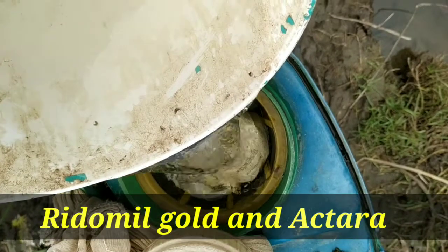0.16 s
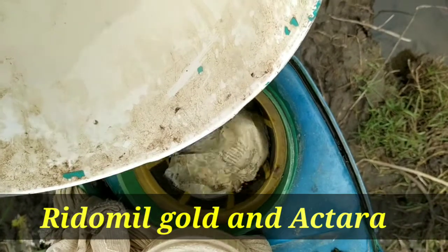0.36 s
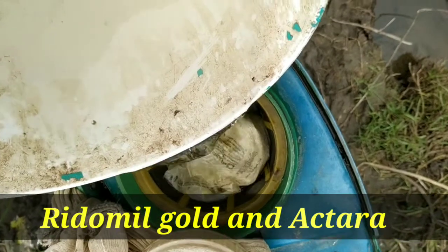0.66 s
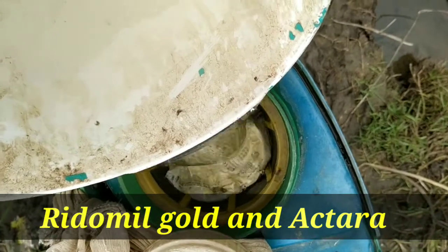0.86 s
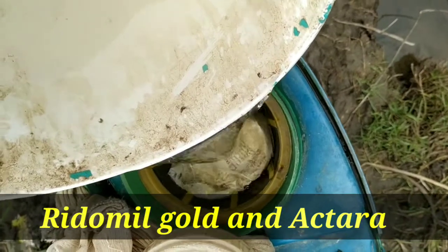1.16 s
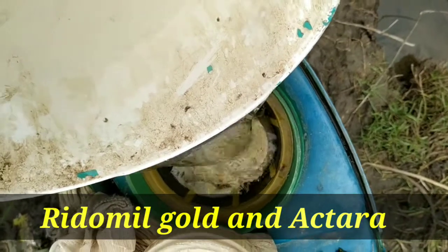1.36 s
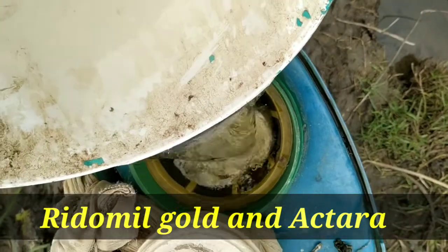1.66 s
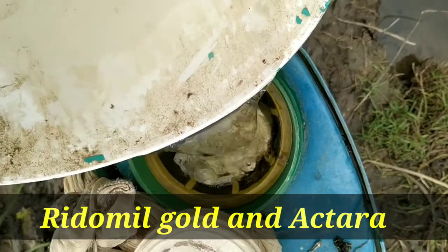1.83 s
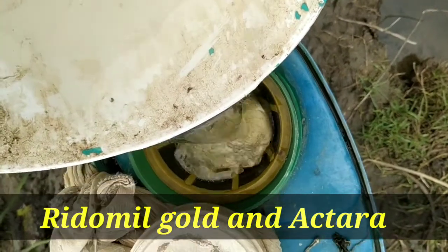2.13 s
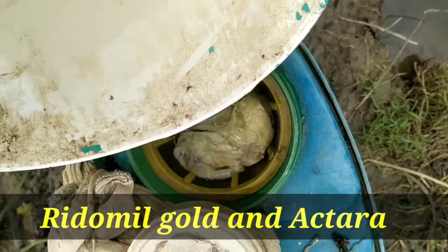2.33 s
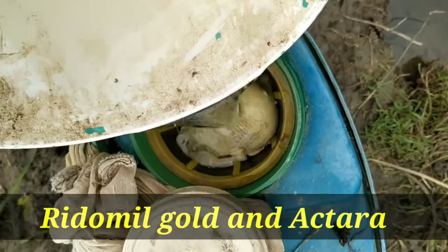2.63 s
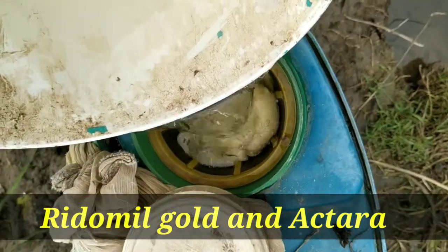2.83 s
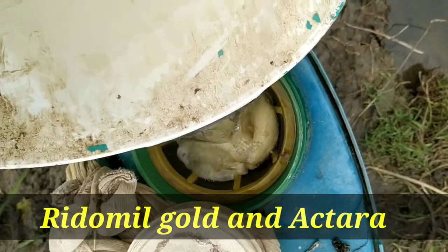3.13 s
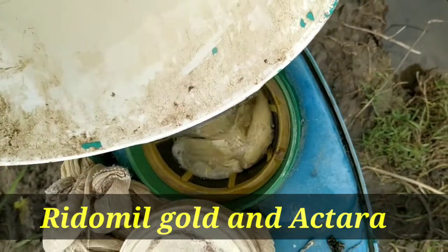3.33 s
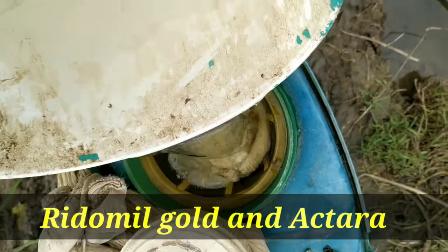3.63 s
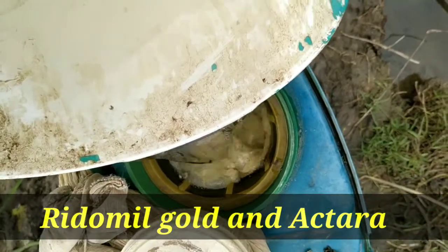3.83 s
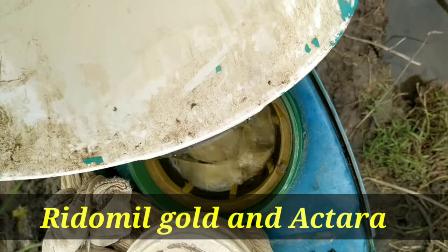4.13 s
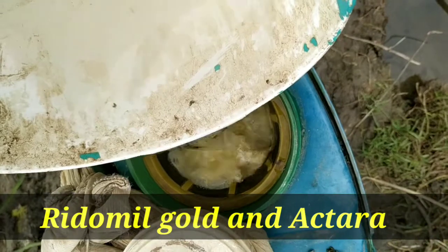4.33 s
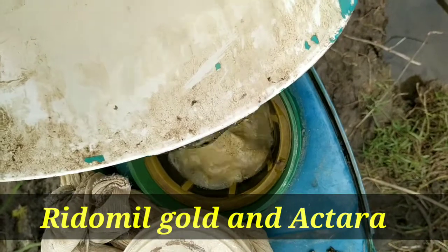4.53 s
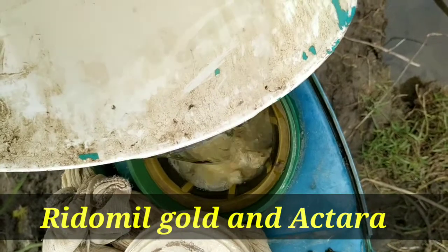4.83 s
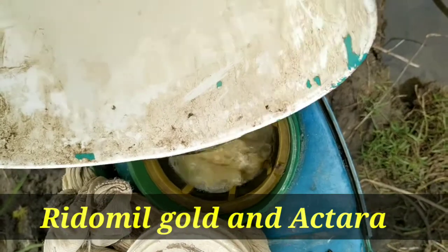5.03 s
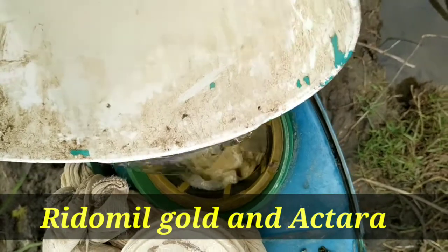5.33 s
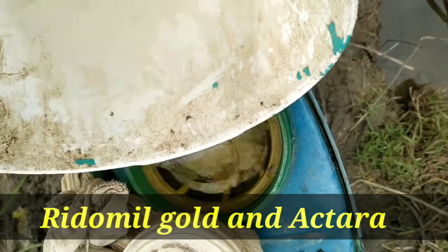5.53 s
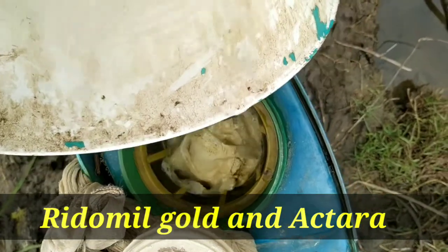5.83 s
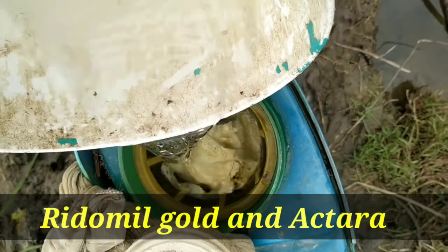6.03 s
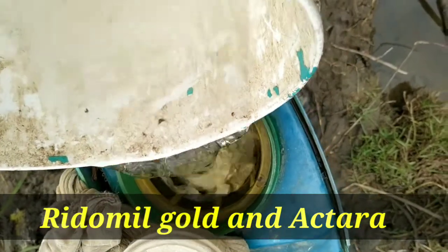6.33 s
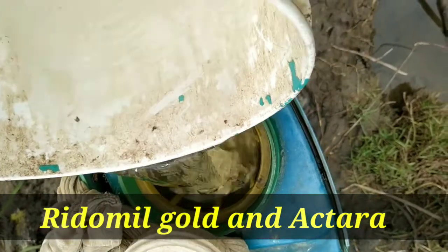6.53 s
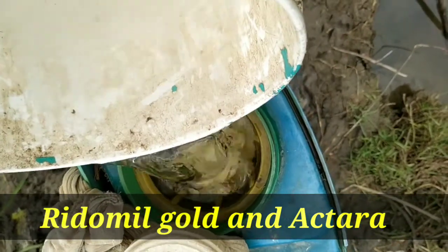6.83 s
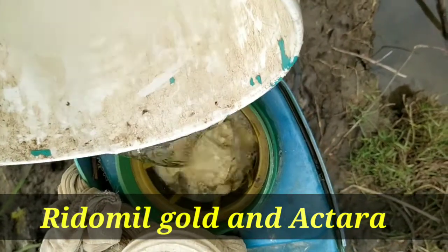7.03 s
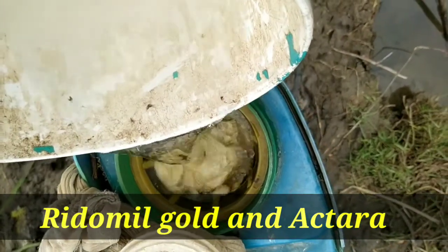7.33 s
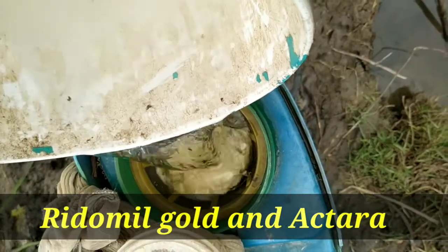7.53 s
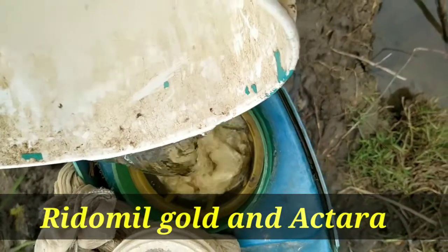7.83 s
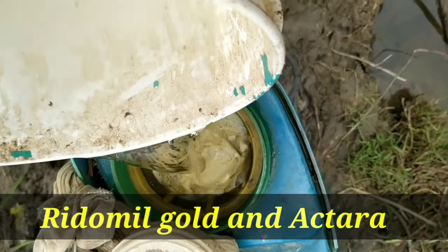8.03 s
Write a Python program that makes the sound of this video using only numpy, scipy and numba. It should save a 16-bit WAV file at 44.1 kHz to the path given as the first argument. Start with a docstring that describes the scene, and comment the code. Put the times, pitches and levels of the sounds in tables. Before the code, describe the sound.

Water pours in uneven spurts from a basin through a cloth-lined strainer into a hollow plastic tank, gurgling and crackling while wind buffets the microphone.

```python
"""Outdoors, water runs from a tilted basin through a cloth-lined strainer into a plastic sprayer tank.
Bubbles gurgle and droplets crackle in uneven spurts, built from many short, dying sine tones.
Filters make the tank ring, more strongly when its neck is open; delayed copies echo in the strainer.
Filtered noise makes the wind rumble and buffet on the microphone, with low thumps from hard eddies.
Fading tones make two knocks on the plastic: a loud dull one, then a faint brighter one."""
import sys
import numpy as np
from scipy import signal
from scipy.fft import rfft, irfft, next_fast_len
from scipy.io import wavfile
from scipy.ndimage import uniform_filter1d, map_coordinates
from numba import njit

SR = 44100
rng = np.random.default_rng(int(sys.argv[2]) if len(sys.argv) > 2 else 0)


def log_audio(samples):
    """Write samples as a 16-bit WAV file to the path given in sys.argv[1]."""
    # one column per channel
    frames = np.atleast_2d(samples).T
    # limit to full scale, then quantise
    limited = np.clip(frames, -1, 1)
    pcm = np.round(limited * 32767).astype(np.int16)
    wavfile.write(sys.argv[1], SR, pcm)


N = 360738
TIME = np.arange(N) / SR  # seconds

# colour of the faint open air: (frequency [Hz], relative level [dB])
AIR_COLOUR = [(100, -1.5), (400, -18.5), (1000, -10.5), (3000, -22.5), (15000, -26)]

# changing strength of the breeze: (time [s], level [dB])
BREEZE = [(0, -45.5), (.9, -49.5), (1.3, -48.5), (2.4, -39), (4.4, -45.5), (5.3, -43), (5.7, -49),
          (6.2, -56.5), (6.55, -44.5), (7.0, -52.5), (8.18, -46)]
# gusts that swell and ebb on top of it: (time of crest [s], width [s], level [dB])
GUSTS = [(1.33, 0.14, -32), (1.89, 0.039, -33.5), (2.52, 0.055, -33.5), (2.8, 0.037, -27.5),
         (3.072, 0.026, -26.5), (3.29, 0.034, -36), (3.49, 0.018, -23.5), (3.83, 0.33, -33),
         (4.193, 0.026, -21), (4.47, 0.12, -30.5), (7.69, 0.032, -38.5), (8.12, 0.041, -35.5)]
# colour of the wind's rumble: (frequency [Hz], relative level [dB])
RUMBLE_COLOUR = [(12, -2.5), (25, -2), (50, -2.5), (90, -6.5), (140, -15), (220, -24.5), (320, -36),
                 (800, -82.5)]
# sharp buffets: (start [s], length [s], strength added to the wind pressure [dB])
BUFFETS = [(1.008, 0.052, -40.5), (1.832, 0.13, -40.5), (2.152, 0.093, -42), (2.346, 0.025, -32.5),
           (2.447, 0.051, -27.5), (2.501, 0.08, -27.5), (2.572, 0.033, -29.5), (2.829, 0.018, -31),
           (3.052, 0.022, -29), (3.099, 0.054, -35.5), (3.461, 0.037, -28), (3.605, 0.054, -32.5),
           (3.726, 0.055, -26), (3.765, 0.063, -24), (3.859, 0.017, -26.5), (3.908, 0.029, -24),
           (4.01, 0.036, -26), (4.161, 0.043, -21.5), (4.313, 0.051, -32), (8.084, 0.045, -40)]
# colour of the buffets: (frequency [Hz], relative level [dB])
BUFFET_COLOUR = [(30, 0.5), (60, 8), (130, 2), (260, -5), (420, -18), (600, -54), (900, -37), (1600, -55)]
# round, low thumps from the hardest eddies: (time of crest [s], top of the swell [dB], pitch [Hz])
THUMPS = [(1.037, -36.5, 167), (1.398, -30, 140), (2.36, -30.5, 302), (2.479, -27.5, 169),
          (2.536, -24, 287), (3.061, -22, 195), (3.787, -21, 130), (3.808, -21.5, 200), (3.861, -21.5, 266),
          (3.927, -23, 265), (4.02, -24.5, 280), (4.17, -23, 490), (4.186, -24, 109)]
THUMP_CYCLES = 0.77  # half-width of the swell [cycles]

# knocks on the plastic: (start [s], level on top of the mode levels [dB], brightness [Hz])
KNOCKS = [(4.9396, -25, 470), (5.754, -41.5, 1400)]
# ringing modes of the plastic: (pitch [Hz], relative level [dB], time to fall 60 dB [s])
PLASTIC_MODES = [(202, -11.5, 0.24), (295, -0.5, 0.081), (376, 7, 0.051), (423, -7, 0.15),
                 (552, 1.5, 0.039), (777, 0, 0.054), (993, 3.5, 0.061), (1250, 3, 0.031)]

# spatters of tiny drops: (start [s], length [s], level [dB])
SPATTERS = [(0.145, 0.02, -49), (0.9, 0.017, -50), (1.115, 0.0096, -43), (1.364, 0.016, -48),
            (1.5, .022, -48), (1.786, 0.019, -52), (2.752, 0.022, -53), (3.52, 0.02, -48),
            (4.144, 0.017, -50), (5.668, 0.021, -50), (5.85, 0.02, -49.5), (6.336, 0.0044, -60),
            (7.428, 0.04, -54), (8.071, 0.12, -52.5)]
# colour of the spatters: (frequency [Hz], relative level [dB])
SPATTER_COLOUR = [(4000, -8), (6000, -4), (15500, 2)]
# drops that smack on the strainer: (start [s], peak level [dB], brightest pitch [Hz])
DROPS = [(0.238, -31.5, 5800), (0.607, -38, 5330), (0.763, -37, 4530), (0.948, -39.5, 1290),
         (1.485, -36, 14000), (1.764, -26, 4960), (2.093, -32.5, 6530), (2.143, -26, 3800),
         (2.162, -34, 4500), (3.175, -33, 12000), (3.803, -38, 1190), (4.864, -37.5, 2500),
         (4.975, -48, 2880), (5.47, -35.5, 3940), (5.507, -33, 5270), (5.575, -33, 5100),
         (5.716, -38, 5800), (6.094, -42, 1920), (6.118, -28, 8500), (6.2054, -35, 6000),
         (6.336, -36, 5370), (6.457, -29.5, 6440), (6.828, -31, 5940), (6.8843, -32, 5890)]
SMACK_WIDTH = .35  # bandwidth of a smack, as a share of its brightest pitch
# single large bubbles, level before flutter and echo:
# (start [s], level [dB], starting pitch [Hz], time to fall 60 dB [s], pitch rise [share])
PLINKS = [(0.763, -38, 1730, 0.084, 0.055), (1.124, -36.5, 772, 0.045, 0.22),
          (1.7907, -43, 1870, 0.067, .04), (1.809, -31.5, 2230, 0.047, 0.061),
          (1.8911, -34, 1850, 0.019, 0.51), (2.034, -31.5, 2300, 0.024, 0.083),
          (2.3, -40.5, 990, 0.031, 0.083), (2.578, -33, 1500, 0.029, 0.046),
          (2.852, -39, 2340, 0.043, 0.24), (3.203, -40, 984, 0.033, .1), (3.561, -34.5, 2020, 0.015, .1),
          (3.74, -25, 5500, 0.01, .03), (4.149, -32, 5470, 0.019, 0.027), (4.411, -38, 975, 0.028, .08),
          (5.8019, -40, 1070, 0.024, 0.22), (6.456, -33, 5290, 0.019, .03), (6.498, -29, 4130, 0.019, .03),
          (6.569, -42, 1253, 0.14, 3.8), (7.2513, -45, 2115, 0.1, 0.14), (7.558, -33.5, 1436, 0.027, 0.31)]
CUP_T60_S, CUP_DB = 0.035, -9.5  # strainer echo: time to fall 60 dB [s], level before that fall [dB]

# strength of the pour as the basin tips and eases: (time [s], spray level before surges and lulls [dB])
FLOW = [(0, -54), (0.22, -53), (0.7, -59), (1.5, -54), (2.08, -56.5), (2.45, -53.5), (2.6, -61),
        (2.85, -54), (3.35, -60.5), (3.85, -54), (4.45, -56), (4.68, -59), (5.0, -57.5), (5.12, -59),
        (5.4, -61), (5.58, -51), (5.7, -49.5), (5.78, -58), (6.02, -59), (6.2, -56.5), (6.85, -54),
        (7.6, -53), (8.18, -55.5)]
# lulls, when the stream thins: (time of middle [s], width [s], depth [dB])
LULLS = [(0.85, 0.01, -13), (2.405, 0.0055, -11), (5.265, 0.045, -0.5), (5.9, 0.012, -13),
         (6.01, 0.021, -46), (7.151, 0.02, -11), (7.38, 0.05, -8)]
# slops, when a lump of water falls at once: (start [s], length [s], gurgle [dB], spray [dB])
SLOPS = [(0.152, 0.11, -49, -57), (0.322, 0.028, -43.5, -53), (0.402, 0.024, -40.5, -47.5),
         (0.496, 0.04, -44.5, -69), (0.621, 0.015, -46, -41), (0.789, 0.075, -49.5, -52.5),
         (0.946, 0.023, -45, -60), (1.005, 0.031, -51.5, -63), (1.913, 0.1, -46.5, -52),
         (2.151, 0.1, -50, -64.5), (3.185, 0.052, -67, -49.5), (4.856, 0.012, -63, -42.5),
         (4.921, 0.038, -48, -43.5), (5.441, 0.044, -52, -49), (3.986, 0.08, -55, -57),
         (6.055, 0.0087, -39.5, -49), (6.456, 0.14, -59.5, -49), (6.821, 0.099, -61, -48),
         (7.237, 0.047, -54.5, -48), (7.53, 0.051, -53, -48)]
# how much of the hollow tank is heard: (time [s], level beside the gurgle [dB])
NECK = [(0, 2.5), (1.25, -1.5), (1.65, 8), (2.1, 4.5), (2.5, -4.5), (4.1, -1), (4.7, -7.5), (8.18, -3)]
# air resonances of the tank: (pitch [Hz], width [Hz], relative level [dB])
TANK_RESONANCES = [(810, 89, -2.5), (1001, 50, 7), (2097, 420, 13)]
# centre of the tank's moving resonance, mostly climbing as it fills: (time [s], pitch [Hz])
FILL_PITCH = [(0, 1777), (1.5, 1845), (2.3, 1870), (4.4, 1853), (5.6, 2030)]
FILL_WIDTH_HZ, FILL_DB = 39, 0.5  # its width, and its level beside the other resonances
# colour of the gurgling bubbles: (frequency [Hz], relative level [dB])
GURGLE_COLOUR = [(180, -2.5), (380, 5.5), (480, -6.5), (600, 5), (1100, 1), (1500, -3.5), (2050, -6.5),
                 (2600, -13.5), (3400, -48), (5000, -31)]
# colour of the spray: (frequency [Hz], relative level [dB])
SPRAY_COLOUR = [(1500, -13), (2500, -3.5), (3400, -7), (4150, -4.5), (4400, -6.5), (5400, 0), (6500, -4),
                (8500, -7), (12000, -7.5), (15500, -5.5)]
GURGLE_DB, GURGLE_FOLLOW = -57.5, 0.33  # level at average flow, without tank; dB gained per dB of flow
SURGE_DB, SURGE_PER_S = 2.85, 14  # random surges: spread [dB], new values per second
FULL_SPRAY_DB, SOFT_SPRAY_HZ = -56, 8060  # below this level, spray loses its top above this pitch

TOP_HZ = 15800  # highest pitch the recorder keeps


def undb(db):
    """Turn decibels into a gain."""
    return 10 ** (np.asarray(db) / 20)


def curve(rows):
    """Join (time, value) rows by straight lines."""
    return np.interp(TIME, *np.transpose(rows))


def unit(x):
    """Scale a sound to an average (rms) level of 1."""
    return x / np.sqrt(np.mean(x ** 2) + 1e-18)


def even(x, span_s):
    """Hold the rms near 1 over stretches of span_s, leaving faster detail alone."""
    size = max(int(span_s * SR), 8)
    power = uniform_filter1d(uniform_filter1d(x ** 2, size), size)
    return x / np.sqrt(np.abs(power) + 1e-12)


def walk(rate):
    """Wander at random with a spread near 1, heading for a new value `rate` times a second."""
    points = rng.standard_normal(8192)
    # joining points by lines shrinks the spread; the last factor restores it
    return np.interp(TIME * rate, np.arange(len(points)), points) * np.sqrt(3 / 2)


def noise():
    """White noise: all pitches equally strong."""
    return rng.standard_normal(N)


def colour(x, points):
    """Filter through (frequency, level) points, with no sound ahead of its cause."""
    hz, db = np.transpose(points)
    size = next_fast_len(N + 8192, True)
    freqs = np.arange(size // 2 + 1) * SR / size + 1
    gain = undb(np.interp(np.log(freqs), np.log(hz), db))
    # folding the cepstrum forward gives the minimum-phase filter
    cepstrum = irfft(np.log(gain), size)
    cepstrum[1:size // 2] *= 2
    cepstrum[size // 2 + 1:] = 0
    return irfft(rfft(x, size) * np.exp(rfft(cepstrum)), size)[:N]


def resonate(x, hz, width):
    """Favour pitches near hz, with gain 1 at the centre."""
    return signal.lfilter(*signal.iirpeak(hz, hz / width, fs=SR), x)


def glide(x, hz, width):
    """Resonance whose centre follows the curve hz."""
    turn = np.exp(2j * np.pi * np.cumsum(hz) / SR)
    pole = np.exp(-np.pi * width / SR)
    # shift the moving pitch down to zero, smooth there, then shift it back
    return np.real(turn * signal.lfilter([1 - pole], [1, -pole], x / turn))


def bell(middle, width):
    """Bell-shaped rise and fall around a moment."""
    return np.exp(-((TIME - middle) / width) ** 2 / 2)


def add(out, s, sound):
    """Mix a short sound in at time s."""
    start = max(int(s * SR), 0)
    out[start:start + len(sound)] += sound[:max(N - start, 0)]


def open_air():
    """Faint filtered noise stands for the open air."""
    return undb(-59.5) * unit(colour(noise(), AIR_COLOUR))


def air_speed():
    """Strength of the wind: bell-shaped gusts add their power to the breeze."""
    gusts = (undb(db) * bell(s, width) for s, width, db in GUSTS)
    return np.sqrt(undb(curve(BREEZE)) ** 2 + sum(gust ** 2 for gust in gusts))


def wind():
    """Eddies rumble on the microphone; stronger wind brings out more of the higher buffets and flaps."""
    breeze = air_speed()
    rumble = even(colour(noise(), RUMBLE_COLOUR), 0.086) * breeze * undb(3.64 * walk(22))
    pressure = 0.55 * breeze ** 1.34
    for s, length, db in BUFFETS:
        push = signal.windows.tukey(max(int(length * SR), 8), .6)
        add(pressure, s, undb(db) * push)
    buffets = pressure * even(colour(noise(), BUFFET_COLOUR), 0.039)
    flaps = unit(resonate(resonate(noise(), 455, 270), 455, 270))
    # squaring the pressure favours flaps in the hardest buffets
    return rumble + buffets + 1.01 * pressure ** 2 * flaps


def thumps():
    """An eddy pushes and pulls on the microphone for a cycle or two."""
    out = np.zeros(N)
    for s, db, hz in THUMPS:
        cycles = hz * (TIME[:4096] - TIME[2048])
        swell = np.exp(-(cycles / THUMP_CYCLES) ** 2)
        wave = np.sin(2 * np.pi * (cycles + rng.random()))
        add(out, s - TIME[2048], undb(db) * swell * wave)
    return out


def knocks():
    """The plastic rings briefly; each knock has its own brightness, above which the modes weaken."""
    out, t = np.zeros(N), TIME[:6000]
    push = np.minimum(t / 0.0025, 1)  # the blow builds up over a short contact
    for s, level_db, bright_hz in KNOCKS:
        modes = np.zeros(len(t))
        for hz, db, t60 in PLASTIC_MODES:
            tone = undb(db - 60 * t / t60) * np.sin(2 * np.pi * hz * t)
            modes += tone / (1 + (hz / bright_hz) ** 4)
        add(out, s, undb(level_db) * push * modes)
    return out


@njit
def ring(times, hz, t60, size, rise, onset):
    """Each bubble is a fading sine that swells over `onset` cycles and glides in pitch by `rise`."""
    out = np.zeros(N)
    for k in range(len(times)):
        start, length, phase = int(times[k] * SR), t60[k] * SR, 0.
        gain, fade = size[k], np.exp(-6.9 / length)
        for i in range(min(int(length), N - start)):
            phase += min(hz[k] * (1 + rise[k] * i / length) / SR, .45)
            out[start + i] += gain * min(phase / onset, 1.) * np.sin(2 * np.pi * phase)
            gain *= fade
    return out


def bubbles(flow, low_hz, high_hz, cycles, scatter_db, rise, count):
    """Drops land more often when the flow surges; each traps three bubbles of like size within milliseconds."""
    when, pitch, loud = np.repeat(rng.random((count, 3)), 3, axis=0).T
    delay, detune, life, lift, share = rng.random((len(when), 5)).T
    births = np.cumsum(flow)
    times = np.interp(when, births / births[-1], TIME) + .007 * delay ** 2
    hz = low_hz * (high_hz / low_hz) ** pitch * 2 ** (0.577 * (detune - .5))
    t60 = cycles * 2 ** (3 * life - 2) / hz
    # most drops are faint, a few loud; small bubbles are short, so they peak higher
    size = undb(-scatter_db * np.log(loud + 0.023)) * share * hz / low_hz
    return unit(ring(times, hz, t60, size, rise * (2 * lift - .3), 0.19))


def spatters():
    """A sheet of water tears into a shower of tiny drops: a sharp start, then ticks that die away."""
    gain, t = np.zeros(N), TIME[:8192]
    for s, length, db in SPATTERS:
        swell = np.minimum(t / 0.0016, 1) * np.exp(-(t / length) ** 2)
        add(gain, s, undb(db) * swell)
    ticks = bubbles(np.ones(N), 5500, 14400, cycles=13, scatter_db=11.5, rise=0, count=5000)
    return gain * even(colour(ticks, SPATTER_COLOUR), 0.011)


def drops():
    """A drop smacks with a short broad burst and a brief ring."""
    out, t = np.zeros(N), TIME[:2048]
    decay = np.exp(-t / .0016) + .16 * np.exp(-t / .008)
    for s, db, hz in DROPS:
        burst = rng.standard_normal(len(t)) * decay
        smack = resonate(burst, hz, SMACK_WIDTH * hz)
        add(out, s, undb(db) * smack / np.abs(smack).max())
    return out


def strainer_echo(x):
    """Each splash bounces around the strainer cup; the heaving water keeps changing the paths."""
    out = x
    for lag in np.geomspace(.001, .007, 6):  # average delays in seconds
        path = lag * (1 + .12 * walk(9))
        bounce = map_coordinates(x, [(TIME - path) * SR], order=3)
        out = out + undb(CUP_DB - 60 * lag / CUP_T60_S) * bounce
    return out


def plinks():
    """Single large bubbles stand out, gliding up as they surface; churning water makes them flutter."""
    s, db, hz, t60, rise = np.array(PLINKS, float).T.copy()
    flutter = undb(3 * walk(700))
    return strainer_echo(flutter * ring(np.maximum(s, 0), hz, t60, undb(db), rise, 0.69))


def spurts(rate, fall_s):
    """The stream breaks into lumps; each lands at once and runs off. The average is 1."""
    lumps = (rng.random(N) < rate / SR) * rng.exponential(1, N)
    flow = signal.lfilter([1], [1, -np.exp(-1 / (fall_s * SR))], lumps)
    return flow / flow.mean()


def lulls():
    """Dip in dB while the stream thins for a moment."""
    return sum(db * bell(s, width) for s, width, db in LULLS)


def slop_levels():
    """Each slop swells within about 10 ms and dies away: gains for gurgle and spray."""
    gurgle, spray, t = np.zeros(N), np.zeros(N), TIME[:8192]
    for s, length, gurgle_db, spray_db in SLOPS:
        swell = np.minimum(t / 0.0097, 1) * np.exp(-(t / length) ** 2)
        add(gurgle, s, undb(gurgle_db) * swell)
        add(spray, s, undb(spray_db) * swell)
    return gurgle, spray


def pour_levels(neck):
    """Spray follows the flow fully, the gurgle less, and an open neck adds the tank: gains for both."""
    spray_db = curve(FLOW) + lulls() + SURGE_DB * walk(SURGE_PER_S)
    gurgle_db = GURGLE_DB + GURGLE_FOLLOW * (spray_db - spray_db.mean())
    return undb(gurgle_db) * np.hypot(1, neck), undb(spray_db)


def gurgle_and_churn(flow):
    """Large bubbles gurgle in the flow, over the steady noise of churning water."""
    flutter = undb(2 * walk(35))
    large = bubbles(flow * flutter, 239.5, 3337, cycles=28.3, scatter_db=4.0, rise=0.32, count=6800)
    churn = unit(colour(noise(), [(200, -4.0), (4000, -10.5)]))
    # bubbles near the surface ring longer and mostly chirp upward
    chirps = bubbles(flow, 700, 2300, cycles=55, scatter_db=2, rise=0.25, count=300)
    gurgle = unit(colour(large + undb(-7) * chirps + undb(-9.5) * churn, GURGLE_COLOUR))
    return gurgle, churn


def hollow_tank(inside):
    """Air in the tank rings at fixed pitches and at one that moves with filling and heaving water."""
    fixed = unit(sum(undb(db) * resonate(inside, hz, width) for hz, width, db in TANK_RESONANCES))
    heave = 1 + .016 * walk(12)
    filling = even(glide(inside, curve(FILL_PITCH) * heave, FILL_WIDTH_HZ), 0.28)
    return unit(fixed + undb(FILL_DB) * filling)


def cloth_spray(flow):
    """On the cloth, small bubbles fizz and crackle with little or no glide, amid a mist of noise."""
    fizz = bubbles(flow, 2274, 16150, cycles=62, scatter_db=4.0, rise=.08, count=7000)
    crackle = bubbles(flow, 1710, 10100, cycles=8.1, scatter_db=2.0, rise=0, count=1800)
    mist = unit(noise() * flow)
    splashes = strainer_echo(fizz + undb(-4.5) * crackle)
    return even(colour(splashes + undb(-9) * mist, SPRAY_COLOUR), 0.026)


def pour():
    """The stream lands in spurts: large bubbles gurgle and ring the tank, fine spray crackles above."""
    flow = .3 + spurts(rate=80, fall_s=.008)
    gurgle, churn = gurgle_and_churn(flow)
    # water that has passed the strainer drums on steadily inside the tank
    hollow = hollow_tank(gurgle + undb(-3.5) * churn)
    neck = undb(curve(NECK))
    body = even(gurgle + neck * hollow, 0.061)
    spray = cloth_spray(flow)
    body_gain, spray_gain = pour_levels(neck)
    body_slop, spray_slop = slop_levels()
    body_gain = np.hypot(body_gain, body_slop)
    spray_gain = np.hypot(spray_gain, spray_slop)
    # a thin stream lands softly and throws off few of the finest drops
    coarse = signal.sosfiltfilt(signal.butter(2, SOFT_SPRAY_HZ, fs=SR, output="sos"), spray)
    force = np.minimum(spray_gain / undb(FULL_SPRAY_DB), 1)
    landing = force * spray + (1 - force) * coarse
    return body * body_gain + landing * spray_gain


def scene():
    """Water, plastic and wind, all close by, over faint open air."""
    background = open_air() + wind() + thumps()
    water = spatters() + drops() + plinks() + pour()
    return (background + knocks() + water)[None]


def record(dry):
    """The recorder cuts the top."""
    return signal.sosfilt(signal.ellip(10, .2, 70, TOP_HZ, fs=SR, output="sos"), dry)


dry = scene()
out = record(dry)
log_audio(out)
```